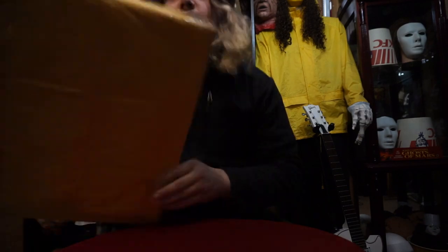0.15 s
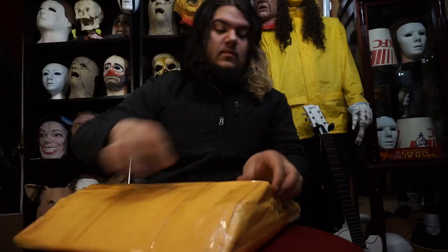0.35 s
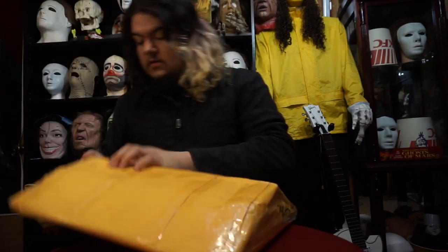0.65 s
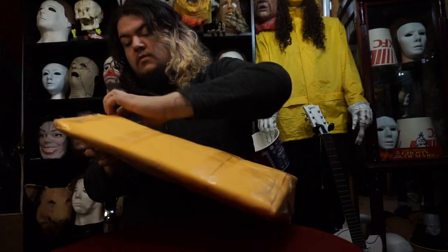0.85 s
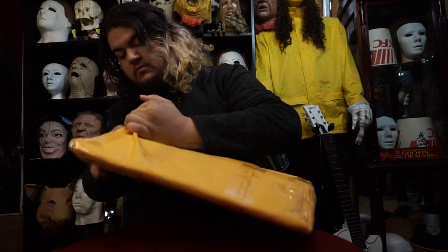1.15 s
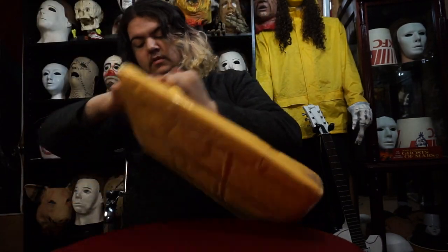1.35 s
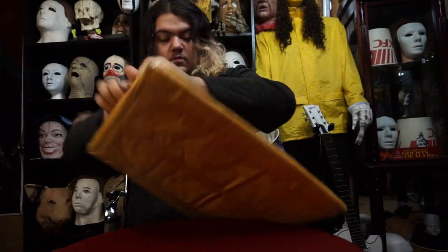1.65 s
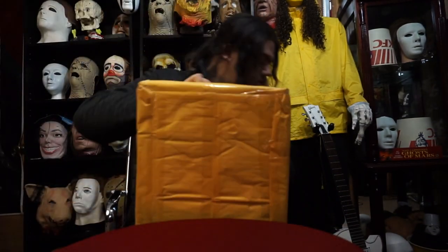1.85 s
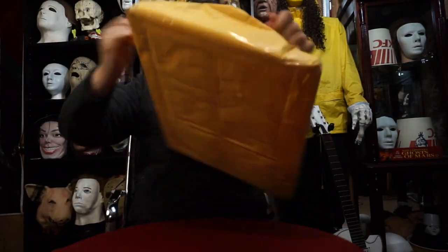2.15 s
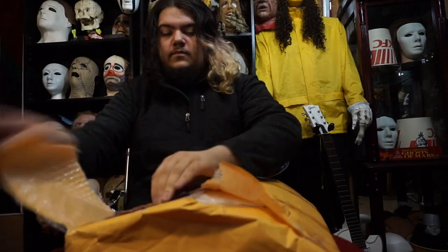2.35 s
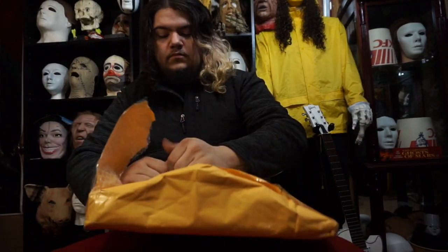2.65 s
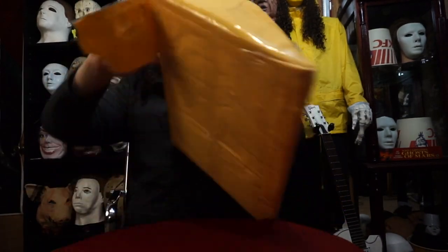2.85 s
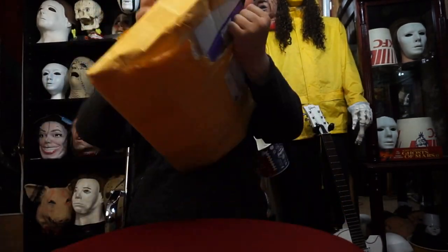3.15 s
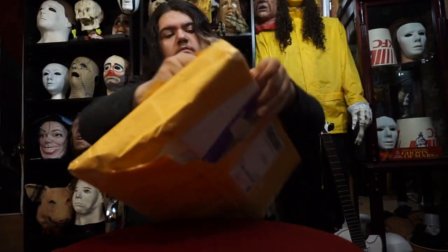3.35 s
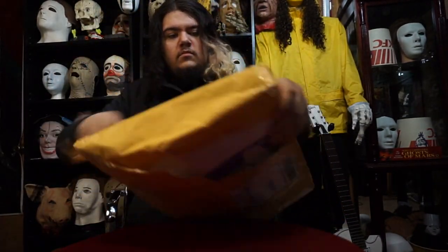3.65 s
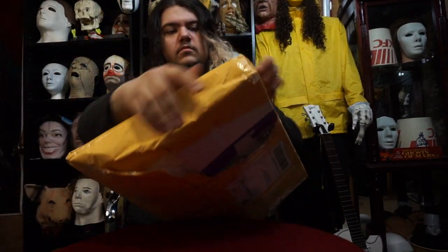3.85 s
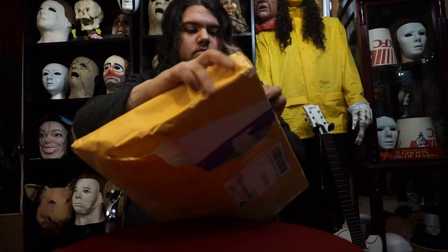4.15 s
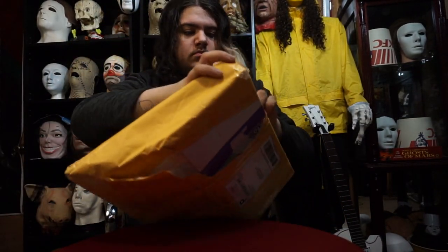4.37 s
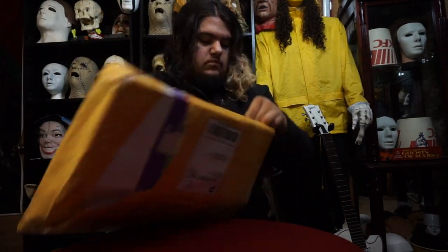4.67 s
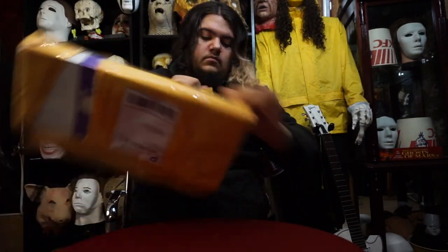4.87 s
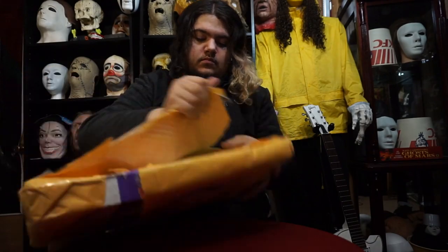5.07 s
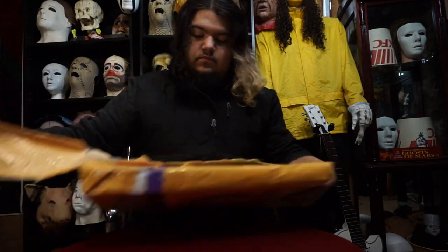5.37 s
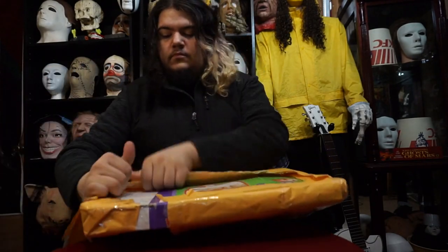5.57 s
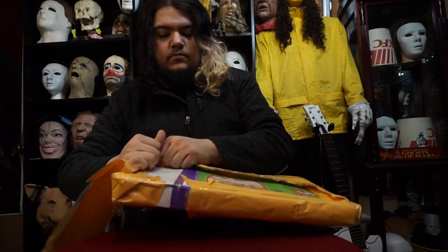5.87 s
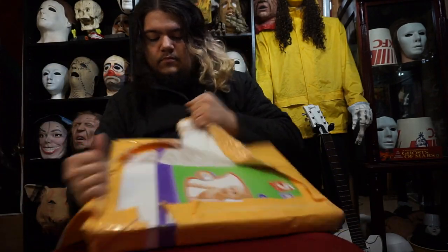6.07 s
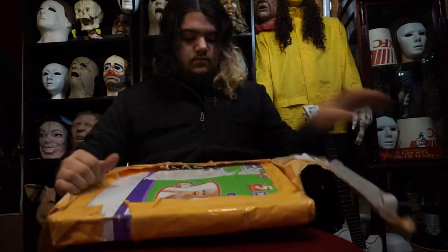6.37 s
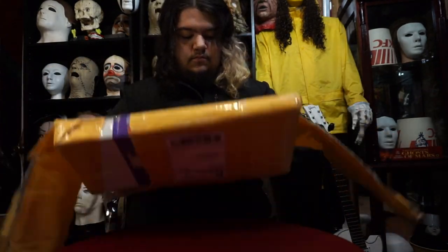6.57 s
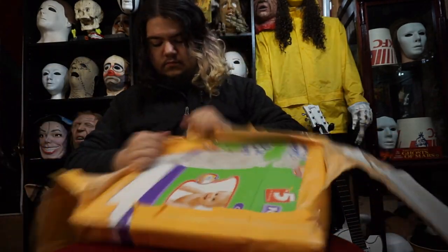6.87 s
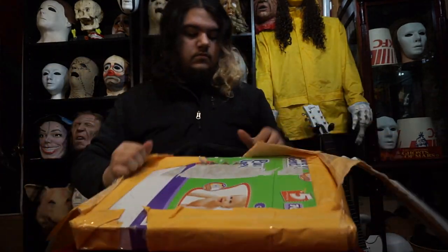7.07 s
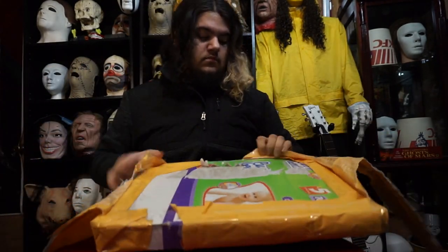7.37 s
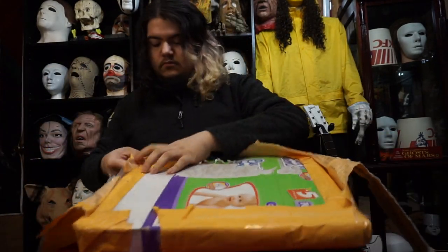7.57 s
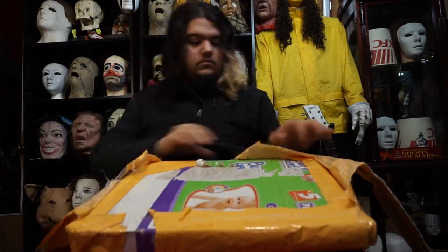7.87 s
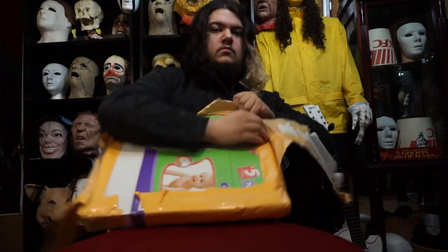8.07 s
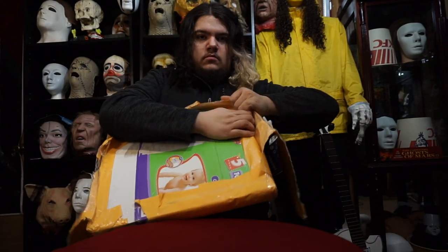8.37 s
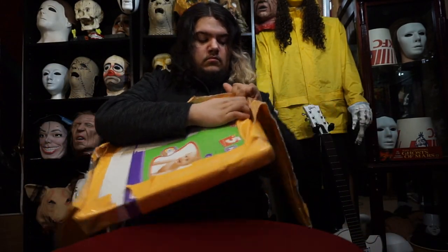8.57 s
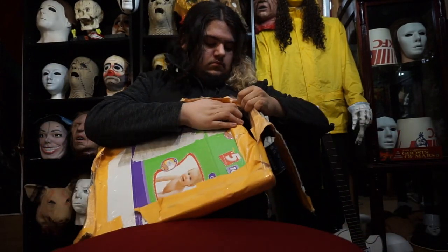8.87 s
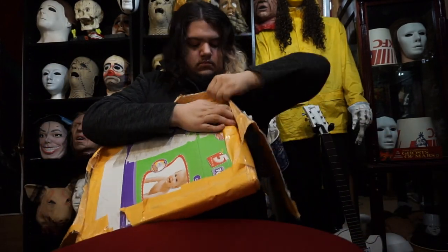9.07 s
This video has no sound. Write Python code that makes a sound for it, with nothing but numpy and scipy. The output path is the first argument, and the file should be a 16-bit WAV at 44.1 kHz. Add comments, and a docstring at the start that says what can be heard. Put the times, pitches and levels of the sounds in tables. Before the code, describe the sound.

A padded paper mailer is handled and torn open in a small furnished room. Dense crinkling comes in short strokes, broken by ragged rips, crisp snaps of folds and tape, and soft hollow bumps. It begins lighter, grows harder around the middle with bursts of tearing, then ends in quick crackling and popping. Two close microphones catch a dry, short room echo and faint air.

```python
"""Opening a padded mailer

A padded paper mailer is turned over, picked at and torn open by hand in a small, furnished room.
Strokes of the hands make dense crackles of tiny creases; rips are short, ragged surges of breaking fibres.
Stiff folds and tape snap as short wavelets with crumbling creases around them, and the parcel bumps softly.
A short scattered echo and quiet air surround it all, heard by two microphones."""
import sys
import numpy as np
from scipy import signal
from scipy.fft import rfft, irfft
from scipy.io import wavfile
from scipy.ndimage import uniform_filter1d

SR = 44100
rng = np.random.default_rng(int(sys.argv[2]) if len(sys.argv) > 2 else 0)


def file_out(sig):
    """Save sig as 16-bit WAV at sys.argv[1]."""
    # one column per channel
    cols = np.atleast_2d(sig).T
    # limit, then scale
    lim = np.clip(cols, -1, 1)
    pcm = np.round(lim * 32767).astype(np.int16)
    wavfile.write(sys.argv[1], SR, pcm)


N = 406602
FREQS = np.fft.rfftfreq(N, 1 / SR)

# Levels in these tables are starting points: each sound's own function trims them further.
# Strokes of the hands over the mailer: start_s, length_s, paper_db (at the middle), swell_db (start to end),
# then relative to the paper: panel_db, bag_db, fizz_db
STROKES = [(0.0, 0.13, -62, 7, -7, -3.5, -11.5), (0.15, 0.28, -51, -10, -0.5, -5.5, -8.5),
           (0.462, 0.26, -49.5, 0.5, -6, -6, -9), (0.747, 0.17, -51, 2, -9.5, -9, -15),
           (0.933, 0.17, -50.5, -5.5, -13, -0.5, -11), (1.177, 0.25, -60.5, 1.5, -9, -7.5, -5.5),
           (1.586, 0.16, -52.5, 9, -8, -4, -9), (1.764, 0.32, -57.5, -16, -10, -2, -9.5),
           (2.05, 0.2, -53.5, 5, -10.5, -5.5, -11), (2.245, 0.31, -51, 6.5, -7, -7, -8.5),
           (2.559, 0.16, -52, 1, -4.5, -6.5, -10.5), (2.734, 0.12, -50, 6, -12, -10, -9),
           (2.889, 0.31, -47.5, -3, -6.5, -11.5, -9.5), (3.232, 0.18, -53.5, 14, -2.5, -13, -5),
           (3.444, 0.06, -47.5, 14, -1.5, -6, -13), (3.55, 0.19, -51, -13, -8.5, -10.5, -6.5),
           (3.847, 0.18, -53, 19.5, -26, -3.5, -9.5), (4.105, 0.13, -59.5, -8, -9, -4.5, -6.5),
           (4.215, 0.2, -48, 3.5, -15, -7, -4), (4.611, 0.32, -48, 8, -8.5, -9, -8.5),
           (5.075, 0.3, -44.5, 6.5, -5, -5.5, -10), (5.453, 0.049, -48.5, -2, -6, -7, -8.5),
           (5.595, 0.086, -46, 13, -3.5, -9.5, -12.5), (5.713, 0.075, -51.5, 9.5, -4.5, -5.5, -10),
           (5.816, 0.17, -46.5, 4.5, -3, -9.5, -8.5), (6.28, 0.13, -60, 17, -16, -17, -11.5),
           (6.456, 0.2, -50, -5, -11, -12, -10.5), (6.68, 0.28, -47, 3.5, -6, -8.5, -9.5),
           (7.025, 0.1, -58.5, 17.5, -14, -7, -10.5), (7.17, 0.18, -52, -14, -4.5, -16, -8.5),
           (7.365, 0.14, -49, -3.5, -11, -11.5, -8.5), (7.56, 0.1, -48, -4.5, -5, -7, -13.5),
           (7.714, 0.15, -63.5, -14, -4.5, -8.5, -9), (7.935, 0.098, -53, 20, -2.5, -8.5, -7.5),
           (8.06, 0.093, -50.5, -8.5, -1, -3, -1.5), (8.186, 0.15, -50, -3, -1, -6, -4),
           (8.352, 0.21, -48.5, 5.5, -1, -6.5, -10), (8.653, 0.21, -49.5, -1.5, -9, -10.5, -8),
           (8.947, 0.16, -56, -9, -6.5, -10, -8), (9.087, 0.14, -46.5, 16, -8.5, -16, -6.5)]
# Small stirring of the held mailer between strokes: paper_db, panel_db, bag_db, fizz_db
REST_LEVELS = (-70, -86, -76, -78)
# Rips and crushes: start_s, length_s, paper_db, then relative to the paper: panel_db, bag_db, fizz_db
RIPS = [(0.322, 0.02, -41, -2, 5.5, -27), (0.873, 0.037, -44.5, -6, -10.5, -12.5),
        (0.95, 0.021, -46.5, -19, -9, -14), (1.034, 0.028, -38.5, -5, -7, -14.5),
        (1.104, 0.033, -42.5, 1.5, -1, -11), (1.455, 0.021, -52.5, 1.5, -8, -18),
        (1.817, 0.02, -46.5, 2, 2, -14), (2.01, 0.041, -42.5, -6, -1.5, -6),
        (2.172, 0.082, -37.5, -6.5, -8, -8), (2.461, 0.073, -52, 4.5, 5.5, -29),
        (2.57, 0.015, -50, 5, -8, -23), (2.759, 0.028, -45.5, 2.5, -9, -6.5),
        (2.939, 0.055, -47, 2, -14, -7), (3.02, 0.055, -39, -2, -12.5, -5.5),
        (3.115, 0.017, -49.5, -8, 1, 1.5), (3.248, 0.021, -44.5, -16, -14, -8.5),
        (3.315, 0.044, -43, -6.5, -6, -7.5), (3.616, 0.022, -35.5, -2, -7, -8),
        (3.998, 0.016, -47, -22, 3, 0.5), (4.317, 0.045, -41.5, -10, -5, -23),
        (4.442, 0.059, -34, -21, -8.5, -10), (4.512, 0.055, -34.5, -8.5, -10.5, -7.5),
        (4.902, 0.022, -37.5, -5, 0, -7.5), (5.204, 0.034, -41, 1, -8, -5.5),
        (5.361, 0.053, -37.5, -3, -6, -10), (6.01, 0.056, -39, -0.5, -10, -16),
        (6.103, 0.038, -38, 1.5, -8, -26), (6.144, 0.1, -36.5, -7.5, -10, -9),
        (6.567, 0.021, -46, -23, -14, -3), (6.835, 0.039, -42, 3.5, -10, -10),
        (6.883, 0.07, -42.5, -4, -13.5, -6.5), (6.987, 0.07, -40.5, -4.5, -6.5, -10.5),
        (7.226, 0.027, -42.5, -3, -6.5, -12), (8.771, 0.04, -44, -1.5, -10.5, -9)]
# Single folds and bits of tape snapping through: start_s, level_db, pitch_hz
SNAPS = [(0.429, -28.5, 1580), (0.5662, -35, 1500), (0.853, -36, 2550), (0.9549, -41, 2390),
         (1.4632, -33.5, 2100), (2.017, -29, 4300), (2.3796, -30, 2644), (2.4886, -35, 1420),
         (2.5844, -29.5, 1460), (2.8054, -27, 2630), (2.8547, -29.5, 2900), (2.871, -29, 2920),
         (3.3141, -31, 2900), (3.627, -36, 1510), (3.8698, -40, 2430), (3.977, -28, 2580),
         (4.228, -33.5, 2540), (4.258, -29.5, 7000), (4.294, -22.5, 5560), (4.3429, -21.5, 2240),
         (4.6354, -39, 2150), (4.6512, -30, 2240), (4.747, -31, 3070), (4.8398, -31, 1710),
         (4.869, -27.5, 8500), (4.9195, -29, 700), (5.0999, -27.5, 2520), (5.2836, -24, 6600),
         (5.296, -26.5, 8540), (5.3119, -27, 2270), (5.6265, -32, 2120), (5.65, -34, 1860),
         (5.6955, -37, 2010), (5.7965, -31, 1590), (5.836, -32, 1900), (5.8737, -27.5, 1970),
         (5.9631, -31, 3240), (5.9815, -30, 2140), (6.3535, -44.5, 2130), (6.5302, -34, 1120),
         (6.587, -24, 7500), (6.606, -26, 3120), (6.8358, -24.5, 1910), (6.936, -21.5, 1700),
         (7.0096, -21.5, 1900), (7.2444, -24, 1690), (7.3366, -32, 2670), (7.4527, -32, 2400),
         (7.6534, -33, 1960), (8.0306, -27, 1380), (8.066, -20, 3200), (8.112, -26, 3100),
         (8.1191, -27.5, 1240), (8.131, -29.5, 1620), (8.239, -29.5, 2580), (8.2846, -31.5, 2330),
         (8.3723, -29.5, 2900), (8.4445, -32, 1500), (8.467, -24.5, 1700), (8.4968, -26.5, 2460),
         (8.5776, -34, 2070), (8.586, -24.5, 2300), (8.594, -25, 2850), (8.6936, -29.5, 2720),
         (8.818, -21.5, 2850), (8.8467, -30, 2680), (8.8868, -23.5, 3030), (9.1457, -32, 2300),
         (9.149, -26.5, 2720)]
# The parcel bumping: start_s, level_db, pitch_hz
BUMPS = [(0.139, -43.5, 80), (0.332, -27, 140), (0.555, -45, 83), (2.465, -36.5, 206), (4.912, -39, 255),
         (5.588, -37, 154), (5.762, -43.5, 223), (6.472, -34.5, 151), (6.53, -40, 262), (6.757, -38, 117),
         (7.411, -42, 191), (8.065, -36, 380), (8.165, -42, 250)]
# Colour of creasing paper: frequency_hz, relative_db_per_hz
PAPER_COLOUR = [(500, -43), (900, -24), (1400, -3), (2100, 2.5), (2700, 2), (3500, -1.5), (4400, -7.5),
                (5500, -21.5), (8000, -28)]
# Colour of the wide panels of the sheet: frequency_hz, relative_db_per_hz
PANEL_COLOUR = [(300, -23), (550, -5), (780, 0), (1200, 1), (1700, -3.5), (3000, -18)]
# Colour of the hollow bag, with its air note a little above 200 Hz: frequency_hz, relative_db_per_hz
BAG_COLOUR = [(25, -33), (50, -23), (80, -15), (130, -10.5), (186, -7.5), (212, 3.5), (260, 1.5), (330, 1),
              (440, 2), (620, -2), (800, -10), (1300, -12), (2500, -51)]
# Colour of tape and fine fibres: frequency_hz, relative_db_per_hz
FIZZ_COLOUR = [(2500, -22), (4200, 1.5), (6500, -0.5), (11000, 0), (13000, -121)]
# Colour of quiet room air: frequency_hz, relative_db_per_hz
AIR_COLOUR = [(25, -10), (100, 3), (250, 7), (550, -22), (11000, -13.5)]
# Strength of the part that differs between the microphones: frequency_hz, gain_db
STEREO_WIDTH = [(250, -20.5), (1200, -9.5), (2500, -11.5), (4200, -6.5), (9000, -7.5)]
# How far the left microphone leads the right: frequency_hz, lead_radians
LEFT_LEAD = [(2400, 0.032), (4400, 1.13), (9000, 0.48)]
# How much louder the left microphone is: frequency_hz, left_minus_right_db
LEFT_BALANCE = [(250, 0), (1000, 0.3), (8000, 1.2)]

STROKE_ATTACK_S, STROKE_RELEASE_S = 0.029, 0.028
RIP_ATTACK_S, RIP_RELEASE_S = 0.022, 0.013
ROOM_T60_S = 0.1  # time for the room's tail to fall by 60 dB
AIR_DB, CUTOFF_HZ = -71.5, 11200


def amp(db):
    """Turns decibels into a gain."""
    return 10 ** (np.asarray(db) / 20)


def unit(x):
    """Scales a sound to an average (rms) level of 1."""
    return x / np.sqrt(np.mean(x ** 2) + 1e-20)


def read(points, hz=FREQS):
    """Reads between the points of a table on a log-frequency axis."""
    point_hz, value = np.transpose(points)
    return np.interp(np.log(hz + 1), np.log(point_hz), value)


def add(mix, start_s, sound):
    """Adds a sound to the mix at a given time."""
    part = mix[max(round(start_s * SR), 0):][:len(sound)]
    part += sound[:len(part)]


def colour(x, points):
    """Filters a sound by a table of levels in dB."""
    return irfft(rfft(x) * amp(read(points)), N)


def effort(moves, attack_s, release_s):
    """Gains of paper, panels, bag and fizz: moves build up, swell evenly in dB and die; overlaps add in power."""
    power = np.zeros((4, N))
    for start, length, db, swell_db, *others_db in moves:
        age = np.arange(0, length + 8 * release_s, 1 / SR)
        build_up = np.minimum(age / attack_s, 1)
        die_away = np.exp(-np.maximum(age - length, 0) / release_s)
        swell = swell_db * (np.minimum(age / length, 1) - .5)
        gain = build_up * die_away * amp(db + swell)
        for layer, layer_db in zip(power, (0, *others_db)):
            add(layer, start, (gain * amp(layer_db)) ** 2)
    return np.sqrt(power)


def crackle(per_s, spread_db, ring_s, spectrum, steady_s, grip_s=.035, count=16):
    """Tiny creases of very unequal size, each ringing one of a few facets of the sheet; level about 1."""
    at = rng.integers(0, N, int(per_s * N / SR))
    size_db = spread_db * np.minimum(rng.exponential(1, len(at)), 4.5)
    size = amp(size_db) * rng.choice([-1, 1], len(at))
    # only two or three facets are under strain at a time, so the colour keeps shifting
    grip = (at / (grip_s * SR) + 2 * rng.random(len(at))).astype(int)
    which = rng.integers(0, count, grip.max() + 1)[grip]
    # each facet is a short, fading burst of noise; two versions make the shared and the differing part
    t = np.arange(256) / SR
    facets = rng.standard_normal((2, count, len(t))) * np.exp(-t / ring_s)
    facets /= np.linalg.norm(facets, axis=2, keepdims=True)
    place = (at[:, None] + np.arange(len(t))).ravel()
    grains = np.array([np.bincount(place, (size[:, None] * f[which]).ravel(), N)[:N] for f in facets])
    # together the facets have the colour given by the table
    together = np.sqrt((abs(rfft(facets, 1024)) ** 2).mean(1))
    together = np.array([np.interp(FREQS, np.fft.rfftfreq(1024, 1 / SR), g) for g in together])
    grains = irfft(rfft(grains) / together * amp(read(spectrum)), N)
    # the hand feeds in energy at an even pace, however it is shared among the creases
    span = max(int(steady_s * SR), 64)
    power = uniform_filter1d(uniform_filter1d(grains[0] ** 2, span), span)
    return grains / np.sqrt(abs(power) + 1e-20)


def slips(per_s, fade_s, slip_db, even_s, snap_slip):
    """The sheet sticks and gives: slips, by chance and optionally at snaps, lift the sound at once, then fade."""
    jumps = (rng.random(N) < per_s / SR) * rng.uniform(0.3, 1, N)
    for start, _, _ in SNAPS:
        jumps[round(start * SR)] += abs(snap_slip)
    fading = signal.lfilter([1], [1, -np.exp(-1 / (fade_s * SR))], jumps)
    power = 1 + amp(slip_db) ** 2 * fading
    # keep the power near 1 when averaged over even_s
    return np.sqrt(power / uniform_filter1d(power, max(int(even_s * SR), 64)))


def flip(hz, cycles, count=600):
    """One crease flipping over: a brief wavelet that rises and fades within a few cycles or less."""
    turns = np.arange(count) * hz / SR
    return turns / cycles * np.exp(1 - turns / cycles) * np.sin(2 * np.pi * (turns + rng.random()))


def crinkles(level, per_s, low_hz, high_hz, over_db, most_db, cycles=0.52):
    """Small separate creases stand out of the crackle, each at its own pitch; their size has a limit."""
    out = np.zeros((2, N))
    for when, pitch, size, place in rng.random((int(per_s * N / SR), 4)):
        limited = min(level[int(when * N)] * amp(over_db), amp(most_db))
        peak = limited * (.5 + size) / 2 ** .5
        tick = peak * flip(low_hz * (high_hz / low_hz) ** pitch, cycles)
        add(out[0], when * N / SR, tick)
        add(out[1], when * N / SR, tick * (2 * place - 1))  # a place between the two sides
    return out


def handling(paper_db=-0.8, panel_db=-0.67, bag_db=-0.2, fizz_db=0.0):
    """Hands bend and slide over the mailer: paper crackles, panels pop, tape fizzes and the bag flexes."""
    strokes = effort(STROKES, STROKE_ATTACK_S, STROKE_RELEASE_S)
    paper, panel, bag, fizz = np.hypot(strokes, amp(REST_LEVELS)[:, None])
    sheet = (amp(paper_db) * paper * crackle(2400, 1.8, 0.001, PAPER_COLOUR, 0.079)
             + amp(panel_db) * panel * crackle(1100, 4.0, 0.0017, PANEL_COLOUR, 0.1)
             + amp(fizz_db) * fizz * crackle(2600, 1.9, 0.00053, FIZZ_COLOUR, 0.034))
    sheet = sheet * slips(per_s=32, fade_s=0.017, slip_db=9.5, even_s=0.11, snap_slip=0.39)
    flex = amp(bag_db) * bag * crackle(700, 3.2, 0.0024, BAG_COLOUR, 0.042)
    paper_ticks = crinkles(paper, 36, 1430, 4400, 11.6, -45)
    fizz_ticks = crinkles(fizz, 30, 3300, 10300, 16.3, -27)
    return sheet + flex + paper_ticks + fizz_ticks


def room_air():
    """Quiet room air: steady, coloured noise."""
    noise = rng.standard_normal((2, N))
    return amp(AIR_DB) * unit(colour(noise, AIR_COLOUR))


def room(x, first_s=0.0062):
    """Shelves and walls scatter a short, soft tail: sparse random echoes that die away."""
    t = np.arange(SR // 2) / SR
    echoes = rng.standard_normal((2, len(t))) * (rng.random((2, len(t))) < 3000 / SR)
    tail = echoes * (t > first_s) * amp(-60 * t / ROOM_T60_S)
    return signal.fftconvolve(x[None], tail / np.linalg.norm(tail[0]), axes=1)[:, :N]


def bumps(cycles=0.61, level_db=-9.0, air_db=-14, air_hz=225, air_s=0.012, scuff_db=-13, scuff_s=0.0091):
    """Padding softens each bump to a short thud; the bag's skin scuffs and its air note rings."""
    (thuds, scuffs), t = np.zeros((2, N)), np.arange(SR // 6) / SR
    for start, db, hz in BUMPS:
        age = t * hz / cycles
        thud = age * np.exp(1 - age) * np.sin(2 * np.pi * hz * t)
        # the lowest bumps ring the air note less
        air_share = min(2 * hz / air_hz, 1) ** 2
        air = (1 - np.exp(-age)) * np.exp(-t / air_s) * np.sin(2 * np.pi * air_hz * t)
        add(thuds, start, amp(db + level_db) * thud + 2 * air_share * amp(db + air_db) * air)
        add(scuffs, start, amp(db + scuff_db) * t / scuff_s * np.exp(1 - t / scuff_s))
    return thuds + scuffs * crackle(900, 1.3, 0.0043, BAG_COLOUR, 0.031)[0]


def rips(paper_db=0.15, panel_db=0.3, bag_db=1.1, fizz_db=1.4, brighten_db=3):
    """Fibres break in a ragged run: panels and bag lean to the start of the tear, fine fizz to its end."""
    def gains(swell_db):
        """Gains of the four layers when every rip swells by swell_db."""
        moves = [(start, length, db, swell_db, *others_db) for start, length, db, *others_db in RIPS]
        return effort(moves, RIP_ATTACK_S, RIP_RELEASE_S)

    _, panel, bag, _ = gains(-brighten_db)
    paper = gains(0)[0]
    fizz = gains(brighten_db)[3]
    tear = (amp(paper_db) * paper * crackle(2800, 2.1, 0.00078, PAPER_COLOUR, 0.026)
            + amp(panel_db) * panel * crackle(1500, 1.9, 0.00061, PANEL_COLOUR, 0.016)
            + amp(bag_db) * bag * crackle(1200, 3.3, 0.0033, BAG_COLOUR, 0.045)
            + amp(fizz_db) * fizz * crackle(3500, 1.8, 0.00036, FIZZ_COLOUR, 0.0079))
    return tear * slips(per_s=90, fade_s=0.0056, slip_db=-0.5, even_s=0.033, snap_slip=0)


def crumbles(paper_db=-20, panel_db=-25, before_s=0.001, after_s=0.0031):
    """Around each snap the neighbouring creases give way in a brief cluster."""
    gain, t = np.zeros(N), np.arange(-SR // 20, SR // 20) / SR
    for start, db, _ in SNAPS:
        add(gain, start + t[0], amp(db) * np.exp(-abs(t) / np.where(t < 0, before_s, after_s)))
    return gain * (amp(paper_db) * crackle(1800, 8.7, 0.00057, PAPER_COLOUR, 0.009)
                   + amp(panel_db) * crackle(1200, 2.4, 0.0005, PANEL_COLOUR, 0.014))


def snaps(cycles=0.51, chip_db=-11, chip_s=0.00043, flap_db=-14, flap_slope=4.4, flap_hz=750, flap_s=0.00084,
          low_cut_hz=420, apart_db=-8, again_db=-9, again_s=0.00148, level_db=-1.0):
    """A fold flips and its neighbour follows; high snaps have more bright chip, low ones more flap of the sheet."""
    out, t = np.zeros((2, N)), np.arange(600) / SR
    usual_hz = np.median(np.array(SNAPS)[:, 2])
    for start, db, hz in SNAPS:
        chip = rng.standard_normal((2, len(t))) * np.exp(-t / chip_s)
        chip_gain = amp(chip_db) * hz / usual_hz
        flap = flip(flap_hz * 2 ** rng.uniform(-0.55, 1.0), flap_s * flap_hz)
        flap_gain = min(amp(flap_db) * (usual_hz / hz) ** flap_slope, .5)
        fold = flip(hz, cycles) + chip_gain * chip[0] + flap_gain * flap
        add(out[0], start, amp(db + level_db) * fold)
        neighbour = flip(hz * 2 ** rng.uniform(-0.44, 1), cycles)
        add(out[0], start + again_s * rng.uniform(.5, 1), amp(db + again_db) * neighbour)
        add(out[1], start, amp(db + apart_db) * chip[1])
    # so small a patch of paper radiates little bass
    return signal.sosfilt(signal.butter(2, low_cut_hz, "high", fs=SR, output="sos"), out)


def pair(shared, apart):
    """Two microphones: both get the shared sound, plus a part that has opposite signs left and right."""
    mid, side = rfft(shared), rfft(apart) * amp(read(STEREO_WIDTH))
    # half of the level and timing offset goes to each side
    lean = amp(read(LEFT_BALANCE) / 2) * np.exp(.5j * read(LEFT_LEAD))
    return irfft(np.array([(mid + side) * lean, (mid - side) / lean]), N)


def scene(room_db=-15, handling_db=-0.78, rips_db=0):
    """The mailer, its tail in the room and the quiet air, heard by two microphones."""
    # row 0 is the shared sound, row 1 the part that differs between the microphones
    mailer = amp(handling_db) * handling() + amp(rips_db) * rips() + snaps() + crumbles()
    mailer[0] += bumps()
    echoes = amp(room_db) * room(mailer[0])
    shared, apart = mailer + echoes + room_air()
    return pair(shared, apart)


def record(dry):
    """A steep low-pass filter takes away what lies above the cutoff."""
    low_pass = signal.firwin(511, CUTOFF_HZ, window=("kaiser", 8), fs=SR)
    return signal.oaconvolve(dry, low_pass[None], "same")


dry = scene()
out = record(dry)
file_out(out)
```